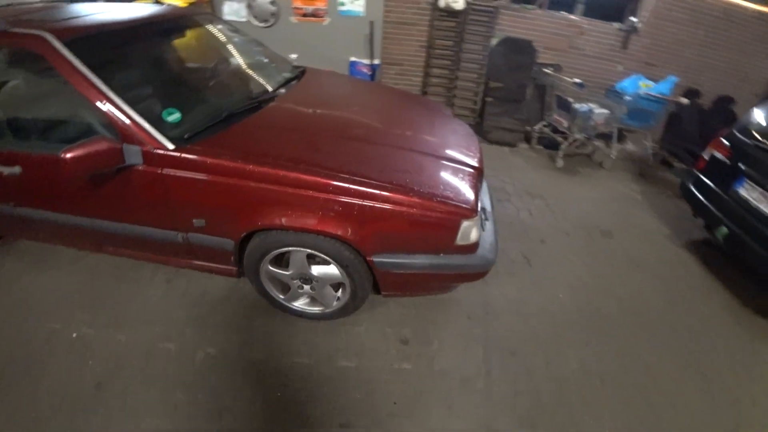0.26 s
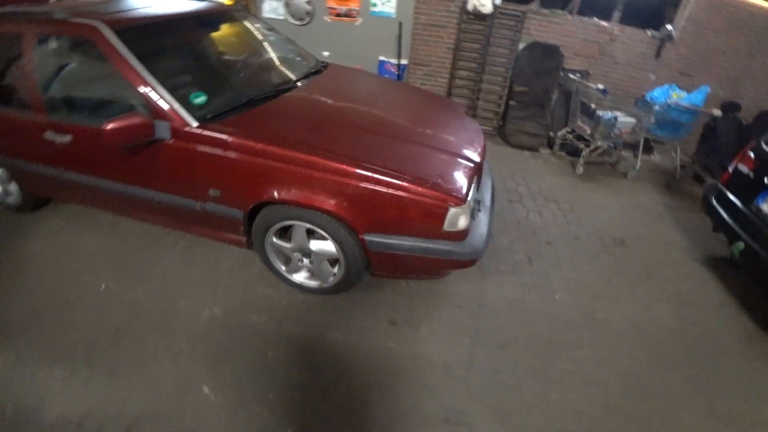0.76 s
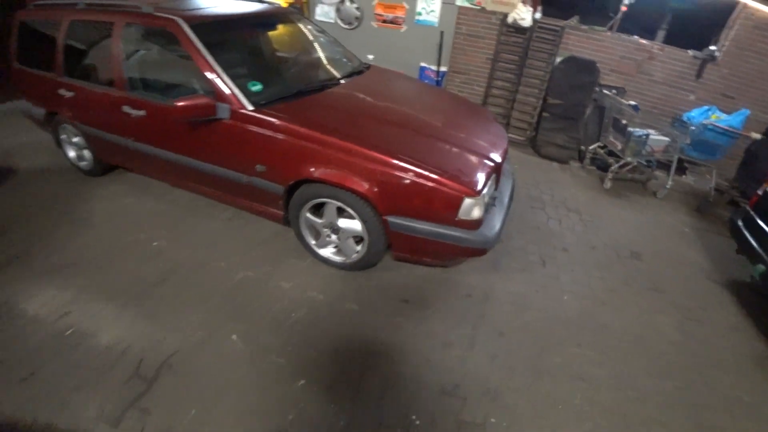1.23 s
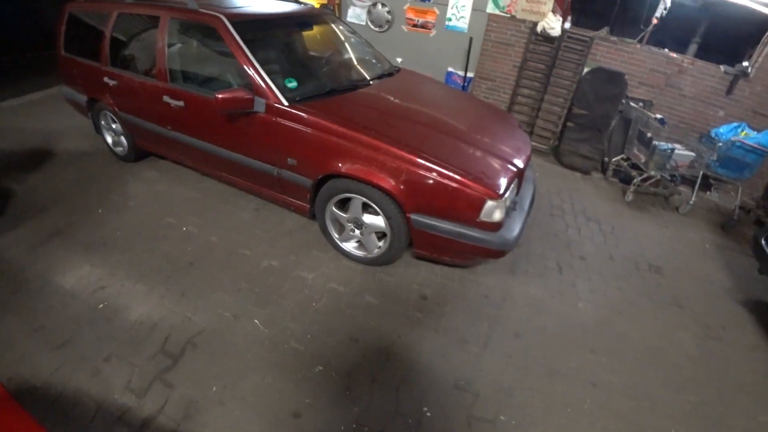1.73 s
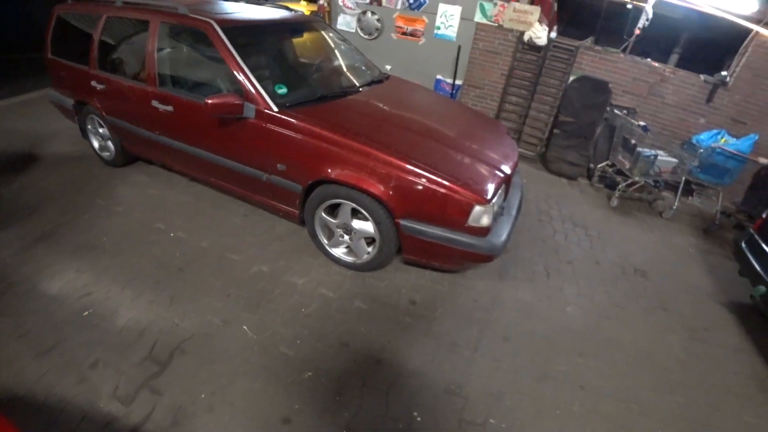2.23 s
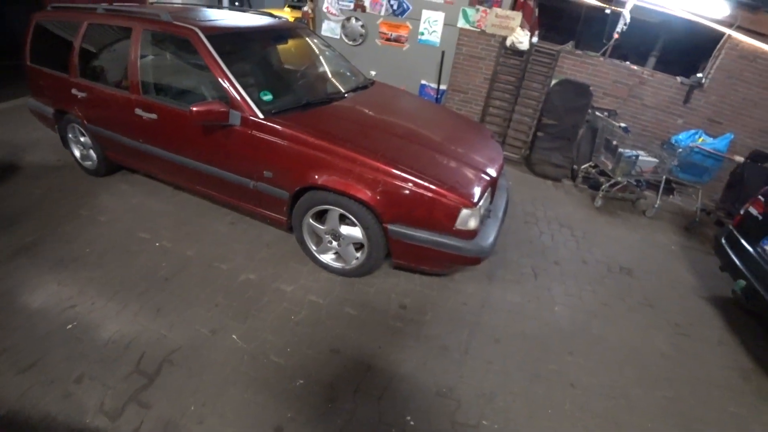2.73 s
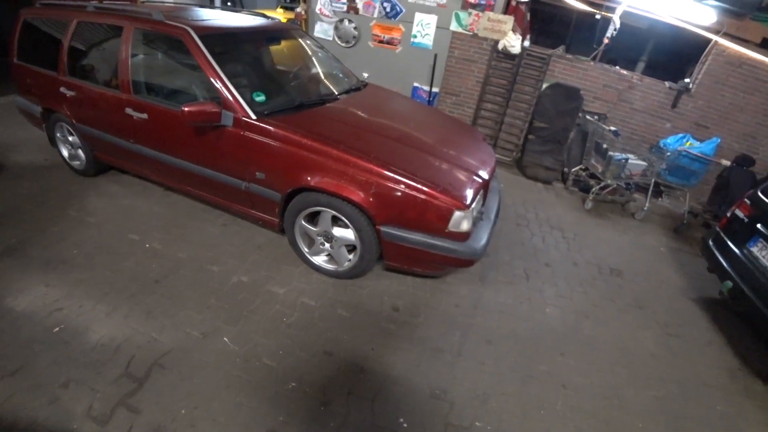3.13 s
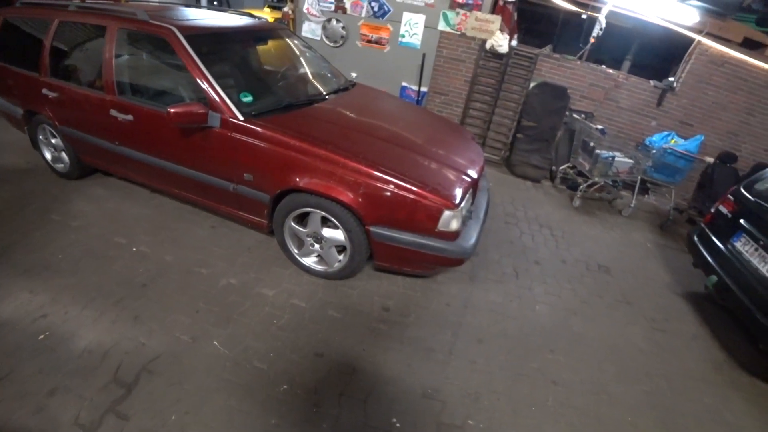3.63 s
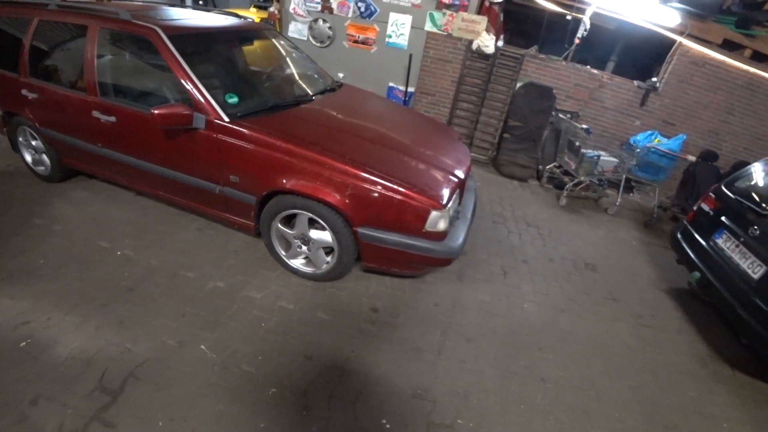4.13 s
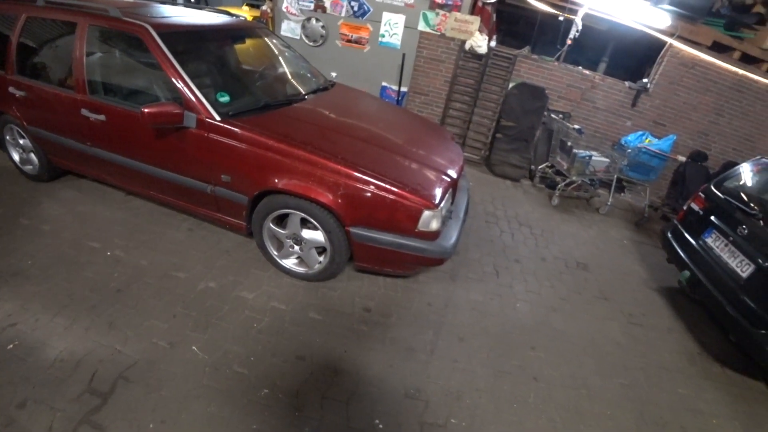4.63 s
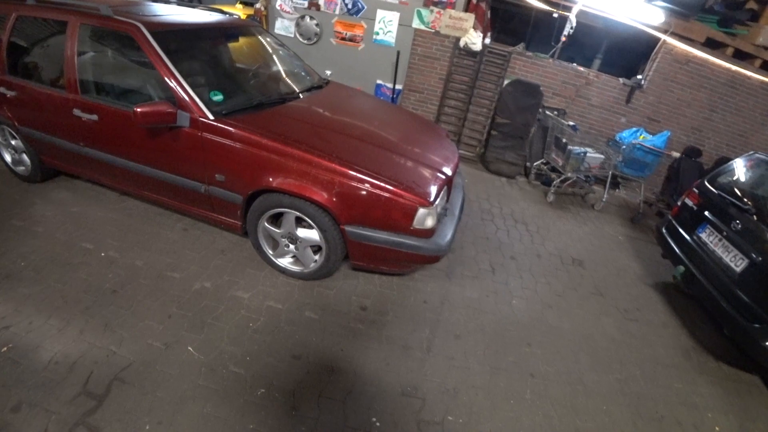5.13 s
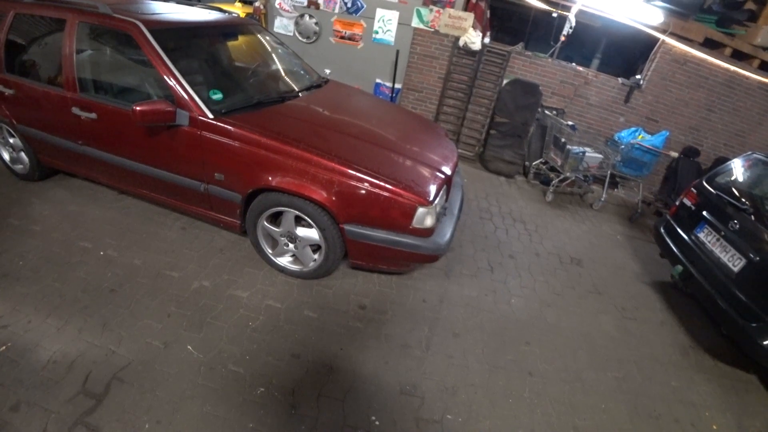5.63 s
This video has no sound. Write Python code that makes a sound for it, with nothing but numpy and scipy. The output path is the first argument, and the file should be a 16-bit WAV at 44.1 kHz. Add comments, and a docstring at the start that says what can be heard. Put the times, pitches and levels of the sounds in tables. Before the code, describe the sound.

Loose thin metal chatters fast and bright over a low engine hum; the idle sags, catches with a small gush, revs briefly and steadies.

```python
"""A dense bright rattle over a low hum is heard first: an old five-cylinder car engine idles in a workshop.
It stumbles, flares up and settles again. The hum is a sum of tones on multiples of the firing rate.
A loose thin metal part chatters against the engine: trains of taps each set off decaying modes and hiss.
In the stumble the taps become sparser and uneven. Belts and air add a dull wash of shaped noise,
and the metal is also heard through sparse reflections of the workshop."""
import sys
import numpy as np
from scipy import signal
from scipy.fft import rfft, irfft
from scipy.io import wavfile
from scipy.ndimage import uniform_filter1d

SR = 44100
rng = np.random.default_rng(int(sys.argv[2]) if len(sys.argv) > 2 else 0)


def generate_wav(sig):
    """Save sig (samples, or channels by samples) to the path in sys.argv[1] as 16-bit PCM at SR."""
    pcm = np.round(np.clip(np.atleast_2d(sig).T, -1, 1) * 32767).astype(np.int16)
    wavfile.write(sys.argv[1], SR, pcm)


N = 258867

# Engine speed. Each row: time in seconds, firings per second.
SPEED = [(0.0, 34.41), (0.1, 36.68), (0.54, 34.29), (0.85, 30.48), (1.09, 27.28), (1.26, 29.91),
         (1.49, 40.19), (1.7, 45.31), (1.89, 46.14), (2.12, 44.33), (2.43, 40.6), (2.64, 37.13),
         (2.8, 36.43), (3.24, 37.62), (3.95, 36.59), (4.25, 36.86), (4.64, 38.24), (5.2, 36.67),
         (5.87, 36.59)]
# How hard the engine works. Each row: time in seconds, exhaust change in dB, wash level in dB.
LOAD = [(0, 0.5, -37), (.52, 1, -35), (.68, 1, -38.5), (.95, -5, -38.5), (1.15, -5.5, -40),
        (1.35, 0, -37.5), (1.6, 5, -36), (1.95, 6.5, -36.5), (2.35, 2, -36), (2.7, -0.5, -36.5),
        (4.2, 0.5, -36.5), (5.87, -0.5, -36.5)]
# What exhaust pipe and workshop make of a tone. Each row: frequency in Hz, gain in dB.
PIPE = [(27, -34), (31, -40), (36, -36), (40, -39.5), (46, -56.8), (60, -51.0), (74, -50.5), (84, -43.5),
        (95, -47.5), (108, -37), (116, -43), (126, -50.5), (137, -52), (148, -46.5), (165, -44), (185, -47),
        (225, -39.5)]
# Main exhaust tones: multiples of the firing rate, and the strength of each in dB before PIPE and LOAD.
MULTIPLES = (1, 2, 3, 4, 4.8)
MULTIPLE_DB = (1, -2, 2.5, 1, -8)
# Tones of unequal cylinders. Each row: multiple of the firing rate, mean level in dB.
UNEVEN = [(.8, -56), (2.2, -57), (2.8, -52), (3.8, -57), (4.2, -58)]
# High growling tones. Each row: multiple of the firing rate, level at idle in dB.
GROWL = [(5.2, -59), (6.4, -59), (7, -59), (7.4, -59), (7.8, -60), (8.6, -60)]
# Colour of the wash. Each row: frequency in Hz, relative density in dB per Hz.
WASH = [(15, -30), (25, -16), (46, -20.5), (74, -18), (119, -11.5), (199, -15), (426, -17), (557, -15.5),
        (698, -17.5), (858, -13.5), (1240, -17), (1530, -13), (1800, -26), (3130, -21), (3400, -29),
        (4420, -10), (7480, -120)]
# Likeness of the wash at the two microphones. Each row: frequency in Hz, left-right correlation (0 to 1).
SAME = [(60, 0.9), (130, 1), (270, 0.91), (570, 0.92), (1200, 0.91), (2530, 0.97), (5350, 0.96),
        (11300, 0.88)]
# Taps in the stumble, loud and weak, in loose clusters with gaps. Each row: time in seconds, peak in dB
# before TYPED_LIFT_DB.
TAPS = [(0.5565, -8), (0.5809, -7), (0.5859, -9), (0.5908, -11), (0.5967, -16), (0.6037, -15), (0.6163, -8),
        (0.6241, -11), (0.6279, -15), (0.6481, -9), (0.6548, -11), (0.6641, -16), (0.6758, -8),
        (0.6815, -10), (0.6909, -10), (0.6971, -16), (0.7037, -9), (0.7352, -9), (0.7444, -9),
        (0.7501, -10), (0.7603, -10), (0.769, -9), (0.7749, -9), (0.7822, -14), (0.7942, -12), (0.804, -13),
        (0.8079, -8), (0.8118, -11), (0.8192, -15), (0.8265, -11), (0.8354, -8), (0.8393, -8), (0.8453, -8),
        (0.8522, -9), (0.8722, -7), (0.8788, -15), (0.8855, -13), (0.9082, -7), (0.9514, -8), (0.9583, -8),
        (0.9785, -8), (0.9859, -9), (1.0075, -8), (1.0532, -7), (1.0856, -8), (1.0919, -14), (1.1164, -11),
        (1.1238, -8), (1.1288, -11), (1.1432, -16), (1.1532, -8), (1.1583, -8), (1.1901, -9), (1.1971, -8),
        (1.2014, -12), (1.2109, -14), (1.217, -10), (1.2214, -12), (1.2276, -9), (1.2325, -16),
        (1.2575, -13), (1.2628, -8), (1.2674, -14), (1.2853, -9), (1.2917, -9), (1.2953, -13),
        (1.3089, -15), (1.3124, -10), (1.3185, -9), (1.3248, -9), (1.3406, -13), (1.3486, -8),
        (1.3526, -12), (1.3583, -14), (1.3638, -16), (1.3686, -16), (1.3728, -8), (1.3801, -8),
        (1.3882, -13), (1.3936, -13)]
# Moments when the loose part swings nearly free. Each row: start in seconds, length in seconds.
PAUSES = [(0.111, 0.016), (0.187, 0.015), (0.305, 0.01), (0.36, 0.023), (0.394, 0.007), (0.472, 0.014),
          (1.489, 0.012), (1.56, 0.011), (1.696, 0.013), (2.092, 0.011), (2.295, 0.015), (2.524, 0.011),
          (2.578, 0.016), (2.765, 0.012), (2.847, 0.009), (2.984, 0.012), (3.008, 0.012), (3.201, 0.009),
          (3.25, 0.011), (3.313, 0.01), (3.439, 0.012), (3.491, 0.01), (3.549, 0.014), (3.727, 0.015),
          (3.786, 0.018), (3.839, 0.011), (3.892, 0.022), (3.975, 0.009), (4.202, 0.017), (4.753, 0.012),
          (4.888, 0.014), (4.994, 0.014), (5.401, 0.02), (5.484, 0.012)]
# The swarm of small taps. Each row: time in seconds, level in dB before the shading.
CHATTER = [(0, -27), (.55, -28), (.9, -32.5), (1.1, -28.5), (1.35, -26.5), (1.6, -22), (2.5, -24.5),
           (5.87, -23.5)]
# Modes of the loose part. Each row: frequency in Hz, bandwidth in Hz, relative strength in dB.
PLATE = [(3630, 64, -14), (4340, 40, -10), (4500, 30, -10), (4650, 70, -6), (4855, 50, -4), (5045, 35, -4),
         (5180, 40, 0), (5370, 70, -2), (5470, 60, -2), (5720, 80, 0), (5800, 50, -3), (6020, 50, -4),
         (6170, 55, -8), (7020, 80, -5), (7400, 60, -10), (8230, 80, -10), (8440, 57, -12), (9390, 73, -12),
         (9980, 53, -15), (10200, 100, -15), (10600, 60, -16)]
# Colour of its dense small modes. Each row: frequency in Hz, relative density in dB per Hz.
CRACK = [(1060, -51), (1800, -30), (2110, -15.5), (2420, -21), (3300, -14.5), (3530, -6.5), (3900, -5.5),
         (5240, 2.5), (5910, -3), (6420, -3.5), (7140, 0), (7760, -10.5), (8370, -11), (8830, -11.5),
         (11000, -17), (14300, -54), (22000, -120)]
# Shading of the rattle by the bodywork at places on the listener's walk. Each row: time in seconds, then
# gain in dB at 3950, 4500, 5150, 6150, 7000 and 9500 Hz.
SHADE = [(.2, -3.5, -0.5, -1.8, 0.83, -1, 4), (.7, -6, 0.5, 0.037, -2.5, 2.5, 1.5),
         (1.1, -5.5, -7, -2.5, -1.2, 0.5, -.5), (1.8, -0.9, 2, -0.17, -2.8, 1.5, 2.1)]
# Band centres of the shading in Hz; the band at 5600 Hz, absent from SHADE, passes unshaded.
SHADE_HZ = (3950, 4500, 5150, 5600, 6150, 7000, 9500)
# Interference where the listener stops: four dips and a peak. Each row: centre in Hz, width in Hz, gain in dB.
DIPS = [(4260, 230, -2), (4410, 47, -3.5), (5100, 36, -7), (5556, 58, -6), (7900, 68, 4.5)]
# The listener slows down and stands: start and end in seconds.
STOP_S = (1.3, 1.7)
# Balance of the microphones. Each row: frequency in Hz, left over right in dB.
LEFT = [(60, 0.0), (110, -0.5), (190, -0.5), (340, -0.5), (620, -0.5), (1100, -0.5), (1970, 0.0),
        (3530, -0.5), (6310, -2.0), (11300, -2.5)]

IDLE_PER_S = 37  # firings per second
PORT_RAD = .055  # phase lead or lag of the firing tone at each microphone
GROWL_DB_PER_HZ, ROAR_DB_PER_HZ = .7, .3  # swell with speed: high tones, and the wash from 250 to 650 Hz
# A short gush of air as the engine catches again: centre, Gaussian width, gain, further gain above 1700 Hz
PUFF_S, PUFF_LENGTH_S, PUFF_DB, PUFF_UPPER_DB = 1.245, .022, 3, 5
BOUNCE_S, BOUNCE_SPREAD_S = .0036, .0017  # least gap between taps, mean of its random addition
BURST_TURNS, EARLIER_PER_HZ = -.26, .017  # burst's place in the firing cycle at idle, earlier with speed
TAP_DB, LULL_DB = -8, -5  # peak in the burst at idle, change midway between bursts
SCATTER_DB, SPEED_DB_PER_HZ = 1.3, 0.02  # mean random loss, gain with speed
PAUSE_DB, RETURN_DB = -11, -2  # change while the part only grazes; first tap afterwards, against TAP_DB
TYPED_LIFT_DB = 0.7  # raises every tap of TAPS
CHATTER_PER_S = 770  # small taps per second where the shaking is 1
BEAT_S = .001835  # the two strongest modes fall in step again, inverted, after this time
EDGE_HZ = 11030  # upper band limit


def gain_of(db):
    """Definition of the decibel: amplitude ratio for a level in dB."""
    return 10 ** (np.asarray(db) / 20)


def evened(x):
    """Power normalisation: scales a signal to unit root mean square."""
    return x / np.sqrt(np.mean(x ** 2) + 1e-20)


def read(points, hz):
    """Logarithmic pitch scale: reads a spectral curve between its points."""
    f, value = np.transpose(points)
    return np.interp(np.log(hz + 1), np.log(f + 1), value)


def curves(rows, t):
    """Linear interpolation in time of every column after the first."""
    s, *columns = np.transpose(rows)
    return [np.interp(t, s, c) for c in columns]


def drift(width):
    """Low-pass filtered chance: noise averaged twice over width seconds wanders slowly."""
    size = max(round(width * SR), 2)
    smooth = uniform_filter1d(rng.standard_normal(N), size)
    return evened(uniform_filter1d(smooth, size))


def firings():
    """Phase is the integral of frequency: running count of firings."""
    return np.cumsum(curves(SPEED, np.arange(N) / SR)[0]) / SR


def main_taps():
    """Periodic excitation: each firing strengthens a burst of bounces; in the stumble taps are sparser, uneven."""
    gap, scatter = rng.exponential(1, (2000, 2)).T
    s = np.cumsum(BOUNCE_S + BOUNCE_SPREAD_S * gap)
    typed_s, typed_db = np.transpose(TAPS)
    outside_stumble = (s < typed_s[0] - BOUNCE_S) | (s > typed_s[-1] + BOUNCE_S)
    keep = (s < N / SR) & outside_stumble
    s, scatter = s[keep], scatter[keep]

    over_idle = curves(SPEED, s)[0] - IDLE_PER_S
    cycle = firings()[(s * SR).astype(int)] - BURST_TURNS + EARLIER_PER_HZ * over_idle
    peak_db = TAP_DB + LULL_DB * np.sin(np.pi * cycle) ** 2
    peak_db = peak_db - SCATTER_DB * scatter + SPEED_DB_PER_HZ * over_idle

    start, length = np.transpose(PAUSES)
    back = start + length
    paused = ((s[:, None] > start - BOUNCE_S) & (s[:, None] < back - BOUNCE_S)).any(1)
    peak_db = peak_db + PAUSE_DB * paused
    back_db = np.full(len(back), TAP_DB + RETURN_DB)
    return np.r_[s, back, typed_s], np.r_[peak_db, back_db, typed_db + TYPED_LIFT_DB]


def tap_sound(shared):
    """Modal decay after an impact: a faint bright tick, a round blip at 2 ms, dense hiss and ringing modes."""
    hz, t = np.fft.rfftfreq(len(shared), 1 / SR), np.arange(len(shared)) / SR
    blip_hz = 5550 * rng.uniform(.98, 1.02)
    blip = np.exp(-.5 * ((t - .002) / .00038) ** 2) * np.sin(2 * np.pi * (blip_hz * t + rng.random()))
    # a weak inverted copy goes ahead of the blip
    blip = blip - 0.062 * np.roll(blip, -round(BEAT_S * SR)) * (t < .002)
    tick = np.diff(rng.standard_normal(len(t) + 1)) * np.exp(-t / 0.003)

    blow = shared + 0.81 * rng.standard_normal(len(t))
    dense = evened(irfft(rfft(blow) * gain_of(read(CRACK, hz))))
    treble = signal.butter(4, 7700, "high", fs=SR, output="sos")
    top = signal.sosfilt(treble, dense)
    # the treble flashes, then fades
    dense = dense + top * (4.5 * np.exp(-t / 0.0017) - .3)
    dense = dense * gain_of(-60 * t / 0.078)

    ring = np.zeros(len(t))
    for (f, width, db), more_db in zip(PLATE, 2.5 * rng.standard_normal(len(PLATE))):
        decay = gain_of(db + more_db) * np.exp(-np.pi * width * t)
        ring += decay * np.sin(2 * np.pi * (f * t + rng.random()))
    spread = 1 - np.exp(-t / 0.00034)  # the bending waves need a moment to spread
    return blip + gain_of(-19.5) * tick + gain_of(-13.0) * dense * spread + gain_of(-12.5) * ring * spread ** 3


def rattle(count=20):
    """Convolution of impacts with modal responses: main taps, and small ones that crowd in after them."""
    s, peak_db = main_taps()
    main = np.zeros(N)
    # each tap starts 2 ms early so that its blip falls on time
    main[np.clip(((s - .002) * SR).astype(int), 0, N - 1)] = gain_of(peak_db)
    lead = 8192  # samples: the rattle is already going at the start
    main = np.r_[main[-lead:], main]

    # the part still bounces after a main tap, dying away with a time constant of 19 ms
    bounce = signal.lfilter([1], [1, -np.exp(-1 / (0.019 * SR))], main)
    shake = 0.76 + .3 * bounce / bounce.mean()
    strength = gain_of(0.56 * np.minimum(rng.exponential(1, N + lead), 4))
    swarm = strength * (rng.random(N + lead) < shake * CHATTER_PER_S / SR)

    spot = rng.integers(0, count, N + lead)  # where the part is struck
    shared = rng.standard_normal(lead)  # modes that every blow wakes alike
    sounds = [tap_sound(shared) for _ in range(count)]

    def struck(train):
        """Superposition of the blows at all spots."""
        return sum(signal.oaconvolve(train * (spot == k), sound)[lead:N + lead] for k, sound in enumerate(sounds))

    small, big = struck(swarm), struck(main)
    level_db, = curves(CHATTER, np.arange(N) / SR)
    hz, t, z = signal.stft(gain_of(level_db) * evened(small) + big, SR, nperseg=256)
    bands = curves(SHADE, t)
    bands.insert(3, 0 * t)  # the unshaded band
    shade_db = np.array([np.interp(hz, SHADE_HZ, frame) for frame in np.transpose(bands)])
    return signal.istft(z * gain_of(shade_db.T), SR, nperseg=256)[1][:N]


def exhaust():
    """Fourier series on the firing rate: wavering tones; high multiples are rougher, the growl swells with speed."""
    t = np.arange(N) / SR
    per_s, load_db, turns = curves(SPEED, t)[0], curves(LOAD, t)[0], firings()
    main = [(k, db + load_db + read(PIPE, k * per_s)) for k, db in zip(MULTIPLES, MULTIPLE_DB)]
    growl = [(k, db + GROWL_DB_PER_HZ * (per_s - IDLE_PER_S)) for k, db in GROWL]
    ports = PORT_RAD * np.array([[1], [-1]])
    hum = np.zeros((2, N))
    for k, db in main + UNEVEN + growl:
        level = np.sqrt(2) * gain_of(db + 0.38 * k * drift(0.088))
        cycles = k * turns + rng.random() + 0.002 * k ** 2 * drift(0.035)
        # higher multiples lie further apart in phase at the two microphones
        hum += level * np.sin(np.sqrt(k) * ports + 2 * np.pi * cycles)
    return hum


def wash():
    """Filtered noise with amplitude modulation: belts, air and block puff with every firing."""
    frames, hz = N // 256 + 5, np.fft.rfftfreq(1024, 1 / SR)
    a, b, c, d, patches = rng.standard_normal((frames, 513, 5)).T
    patches = evened(uniform_filter1d(uniform_filter1d(patches, 10, 0), 12, 1))
    t = (np.arange(frames) - 2) * 256 / SR
    puff = np.exp(-.5 * ((t - PUFF_S) / PUFF_LENGTH_S) ** 2)
    level_db = curves(LOAD, t)[1] + PUFF_DB * puff
    upper_db = 0.34 + PUFF_UPPER_DB * puff

    same = np.clip(read(SAME, hz), -1, 1)[:, None]
    left = a + 1j * b
    right = same * left + np.sqrt(1 - same ** 2) * (c + 1j * d)
    z = np.array([left, right])

    colour = gain_of(read(WASH, hz))
    colour /= np.sqrt(np.mean((colour * (hz > 260) * (hz < 1700)) ** 2))
    over_idle = curves(SPEED, t)[0] - IDLE_PER_S
    z *= gain_of(ROAR_DB_PER_HZ * np.outer((hz > 250) & (hz < 650), over_idle))
    z *= colour[:, None] * gain_of(1.3 * patches + level_db + upper_db * (hz > 1700)[:, None])
    noise = signal.istft(z, nperseg=1024, noverlap=768)[1][:, :N] / np.sqrt(1024)
    return noise * gain_of(3.0 + 1.02 * np.cos(2 * np.pi * (firings() + 0.36)))


def workshop(x):
    """Reverberation: sparse reflections of random sign from floor and walls; the treble lasts longest."""
    taps = np.zeros((2, SR // 2))
    at = np.arange(80, SR // 2 - 20, 20)
    at = at + rng.integers(0, 20, (2, len(at)))
    np.put_along_axis(taps, at, rng.choice([-1., 1.], at.shape), 1)
    hz, t, z = signal.stft(taps, SR, nperseg=256)
    decay_s = read([(3000, 0.12), (6000, 0.22), (10000, 0.35)], hz)[:, None]  # time to fall by 60 dB
    colour_db = read([(3000, 10), (5500, 3.5), (10000, 8)], hz)[:, None]
    tail = signal.istft(z * gain_of(-60 * t / decay_s + colour_db), SR, nperseg=256)[1]
    return signal.fftconvolve(x[None], tail / np.linalg.norm(tail[0]), axes=1)[:, :N]


def scene():
    """Superposition: the metal, direct and reflected, with exhaust and wash; interference sets in at the stop."""
    hz, walking = np.fft.rfftfreq(N, 1 / SR), rattle()
    dips_db = 0.23 + sum(db * np.exp(-.5 * ((hz - f) / width) ** 2) for f, width, db in DIPS)
    standing = irfft(rfft(walking) * gain_of(dips_db), N)
    metal = walking + (standing - walking) * np.interp(np.arange(N) / SR, STOP_S, (0, 1))
    return metal + gain_of(-9.5) * workshop(metal) + exhaust() + wash()


def record(dry):
    """Saturation and band limit: the left microphone hears less treble, the highest peaks are squeezed."""
    lean_db = read(LEFT, np.fft.rfftfreq(N, 1 / SR)) / 2
    heard = irfft(rfft(dry) * gain_of([lean_db, -lean_db]), N)
    heard = .7 * np.tanh(heard / .7)
    band_limit = signal.firwin(1601, EDGE_HZ, window=("kaiser", 5), fs=SR)
    return signal.oaconvolve(heard, band_limit[None], "same")


dry = scene()
out = record(dry)
generate_wav(out)
```